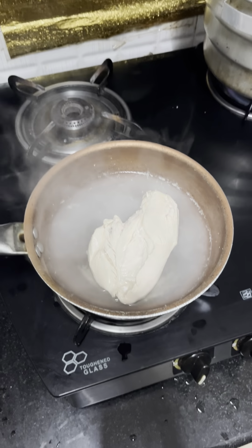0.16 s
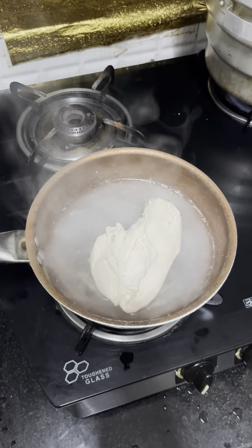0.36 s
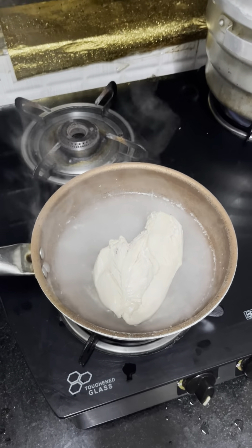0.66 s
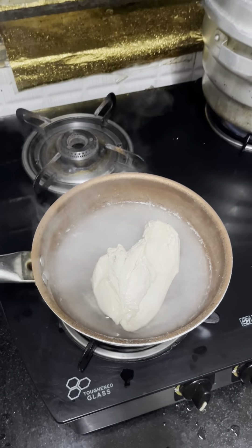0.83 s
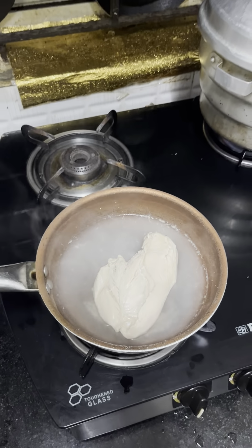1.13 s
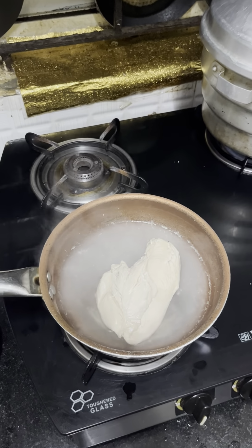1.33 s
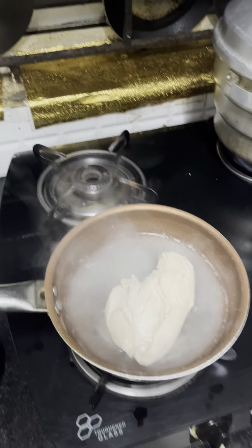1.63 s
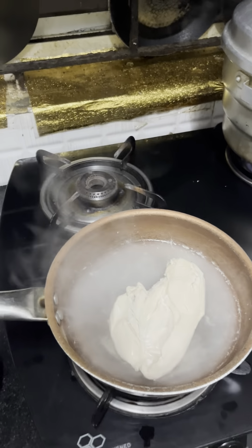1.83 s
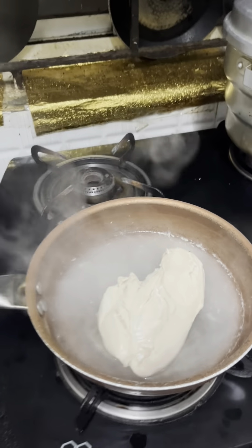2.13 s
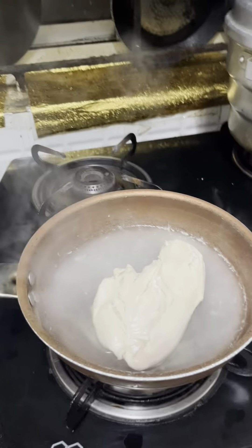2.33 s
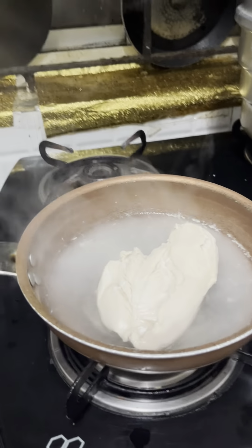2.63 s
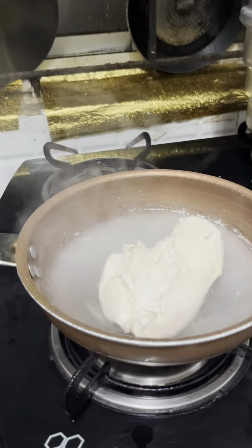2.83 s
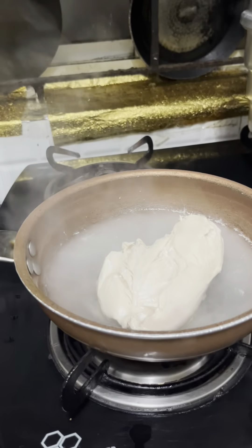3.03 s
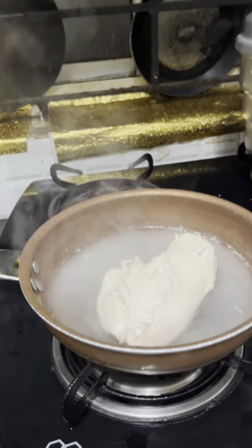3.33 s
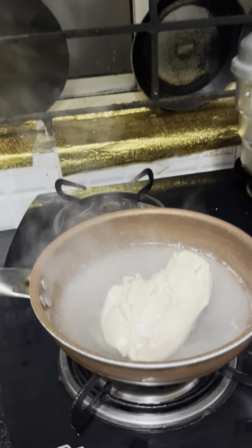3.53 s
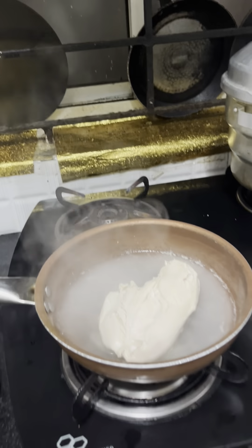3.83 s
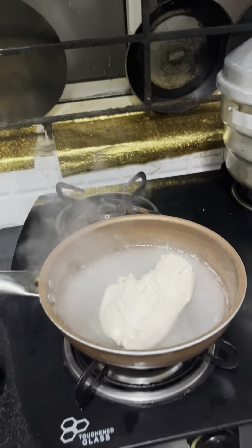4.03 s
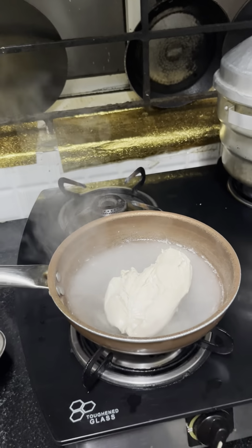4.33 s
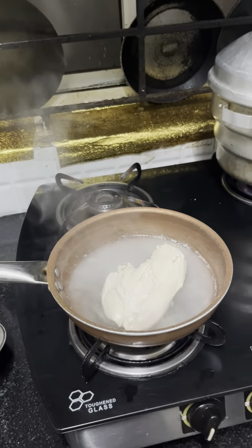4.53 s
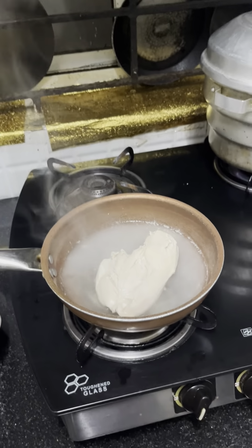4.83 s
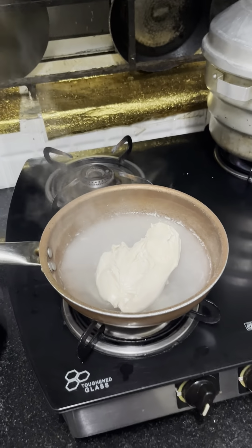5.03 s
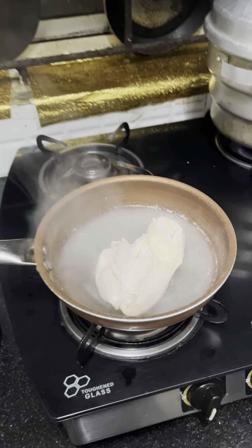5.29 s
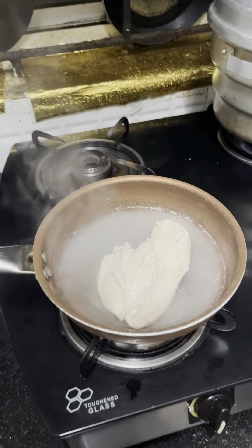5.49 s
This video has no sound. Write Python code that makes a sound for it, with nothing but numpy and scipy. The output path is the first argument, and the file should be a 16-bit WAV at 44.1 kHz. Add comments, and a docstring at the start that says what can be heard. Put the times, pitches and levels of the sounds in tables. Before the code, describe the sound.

Close handheld stereo phone pickup of a pan simmering on a gas stove. It opens with crackling spits over a dense, continuous hiss and the breathy roar of the burner. Low rumble swells in short soft thumps, small bubbles blip and steam pockets gurgle. A fan motor hums below, its deepest tone thinning after the middle. Nearby tiles and metal give short reflections.

```python
"""Shallow water simmers round a piece of chicken in a frying pan on a gas burner, heard from a phone held over it.
From the start the gas rushes and rings the hollows of stove and corner, steam bubbles hiss and a fan motor hums.
Droplets spit on the hot rim, thickest at first; the low rumble swells in short soft booms near 150 Hz and larger
steam pockets gurgle. From 1.7 s the phone leans in, holds and rises; at 3.6 s the fan's blade tone starts to sink
into a node. Round 4.6 s the phone hangs back; echoes off hob, pot and tiles shift with the hand throughout."""
import sys
import numpy as np
from scipy import signal
from scipy.fft import rfft, irfft, next_fast_len
from scipy.io import wavfile

SR = 44100
rng = np.random.default_rng(int(sys.argv[2]) if len(sys.argv) > 2 else 0)


def to_wav(sig):
    """Store sig (one row per channel, or 1-D mono) as 16-bit WAV at the path in sys.argv[1].

    Samples outside -1..1 are clipped; the rate is SR.
    """
    pcm = np.clip(np.atleast_2d(sig), -1, 1) * 32767
    pcm = np.round(pcm).astype(np.int16)
    wavfile.write(sys.argv[1], SR, pcm.T)  # frames by channels


N = 249425
TIME = np.arange(N) / SR
SIZE = next_fast_len(N, True)
FREQ = np.maximum(np.arange(SIZE // 2 + 1) * SR / SIZE, 1)  # bin frequencies in Hz, kept above 0 for logarithms


def amp(db):
    """Level is logarithmic: decibels become an amplitude factor."""
    return 10 ** (np.asarray(db) / 20)


def over_pitch(table):
    """Spectra are drawn on a logarithmic pitch axis: each column is interpolated bin by bin."""
    hz, *columns = np.transpose(table)
    return [np.interp(np.log(FREQ), np.log(hz), column) for column in columns]


def walk(rate_hz):
    """Low-passed noise is a smooth random fluctuation, here of zero mean and unit spread."""
    low_pass = 1 / (1 + (FREQ / rate_hz) ** 4)
    x = irfft(rfft(rng.standard_normal(SIZE)) * low_pass, SIZE)[:N]
    return (x - x.mean()) / x.std()


def ramp(start_s, length_s):
    """Uniform motion: a steady move from 0 to 1."""
    return np.clip((TIME - start_s) / length_s, 0, 1)


def swell(crest_s, width_s):
    """Gaussian envelope: a smooth rise to 1 and back, at 1/e one width from the crest."""
    return np.exp(-((TIME - crest_s) / width_s) ** 2)


def resonance(hz, width_hz):
    """A damped resonator favours its own pitch: gain 1 at the centre, 1/4 one width away."""
    return 1 / (1 + ((FREQ - hz) / width_hz) ** 2) ** 2


def turbulence():
    """Turbulence excites all pitches alike: two unrelated white noises."""
    return rng.standard_normal((2, N))


def bursts(per_s):
    """Shot noise: two trains of clicks at random moments, of random sign and uneven size; unit spread."""
    click = rng.random((2, N)) < per_s / SR
    sign = np.sign(turbulence())
    size = amp(3.5 * turbulence())
    x = click * sign * size
    return x / x.std()


def port_response():
    """Coherence of two receivers: each port's share of a shared and an unrelated sound, as (sound, port, bin)."""
    # Each row: pitch in Hz, likeness of the two microphone ports from 0 to 1, lag of the right port in ms.
    coherence = [(150, .998, 0), (340, .962, -.08), (600, .72, -.06), (1000, .6, .03), (1400, .56, .03),
                 (1750, .85, .02), (2200, .8, .11), (2700, .82, .17), (3700, .33, .22), (4500, .4, .25),
                 (6000, .91, .25), (8000, .89, .25), (10500, .91, .243), (15000, .89, .24)]
    # Each row: pitch in Hz, level of the left port minus the right in dB.
    port_balance = [(60, -1), (150, -0.8), (300, -2.5), (550, -2.7), (900, 0), (1300, 0.7), (2600, 1),
                    (4200, -1.2), (7000, 0), (12000, 0)]
    likeness, lag_ms = over_pitch(coherence)
    likeness = np.clip(likeness, 0, 1)
    sign = np.array([[1], [-1]])  # left, right
    level = amp(sign * over_pitch(port_balance)[0] / 2)
    port = level * np.exp(1j * np.pi * sign * FREQ * lag_ms / 1000)
    shared = np.sqrt((1 + likeness) / 2) * port
    unrelated = np.sqrt((1 - likeness) / 2) * port * sign
    return np.array([shared, unrelated])


def heard(drive, gain, ports):
    """Linear filtering: two white drives of unit spread take on a gain per Hz and reach both ports."""
    at_ports = (rfft(drive, SIZE)[:, None] * ports).sum(axis=0)
    return irfft(at_ports * gain * np.sqrt(SR / 2), SIZE)[:, :N]


def panned(x, pan_db):
    """Level difference places a sound: both ports get it, the left louder by pan_db."""
    return x * amp(np.array([[pan_db], [-pan_db]]) / 2)


def delayed(x, lag_s):
    """Propagation delay: the sound arrives late by a lag that may move, which bends its pitch."""
    return np.interp(TIME - lag_s, TIME, x)


def hollow_note(crest_s, db, hz, length_s, glide=0):
    """Amplitude modulation: a sine swells and dies under a half-sine envelope, gliding by some octaves."""
    progress = np.clip((TIME - crest_s) / length_s + .5, 0, 1)
    turns = np.cumsum(hz * 2 ** (glide * progress)) / SR + rng.random()
    return amp(db) * np.sin(np.pi * progress) * np.sin(2 * np.pi * turns)


def wandering(ring, per_s=1.2, pitch_share=.006, fade_db=1.7):
    """A moving delay shifts pitch: a resonance drifts by a small share, and fades in and out at each port."""
    lag_s = np.cumsum(pitch_share * walk(per_s)) / SR
    fades = [amp(fade_db * walk(per_s)) for _ in ring]
    # dividing by the fade's own strength keeps the mean power
    return np.array([delayed(x, lag_s) * fade / np.sqrt(np.mean(fade ** 2)) for x, fade in zip(ring, fades)])


def flame(lean, back, ports):
    """Turbulent combustion noise rings cavities, whose standing waves shift in strength as the phone moves."""
    # The broad rush of burning gas. Each row: pitch in Hz, level in dB per Hz before gas_db.
    rush = [(22, -102), (35, -87), (44, -71), (53, -72), (64, -59.5), (90, -64.5), (106, -55), (118, -65),
            (240, -67.5), (500, -77.5), (850, -72), (1700, -75), (2800, -75.5), (3800, -84), (8000, -102),
            (13500, -104), (15000, -122)]
    # Hollows of stove, pan and corner. Each row: pitch in Hz, width in Hz, level at the centre in dB per Hz
    # before rumble_db, change when leaning in in dB, change when hanging back in dB.
    hollows = [(138.8, 11.5, -46.5, 0.5, -1.5), (162, 14.3, -47, 1.5, -1), (188.5, 5.6, -53.5, 3, 1),
               (205.3, 8.2, -57.5, 3, 2), (270.4, 25, -59.5, -6, -2), (314.7, 45, -58.5, 2, 1),
               (345, 25, -55.5, -1.5, 0), (396, 32, -65, -11, 3), (423.2, 12.5, -58.5, -2.5, -2),
               (457, 53, -62.5, 4, 2.5), (569.5, 77, -64, -8.5, -1), (664, 78, -67, 4, 2.5),
               (761, 65, -75.5, 7.5, 1), (948, 81, -73, 0.5, -2), (1032, 32, -71.5, -7, -10),
               (1122, 50, -72.5, -2.5, 2), (1452, 34, -70, -6, -0.5), (1595, 82, -73.5, 3, -3),
               (1735, 65, -76, -5.5, 1), (1810, 46, -71, -1.5, -12), (1974, 34, -70, -2.5, -7),
               (2158, 53, -73.5, 4, -2), (2230, 120, -85.5, 7, 3), (2422, 30, -68.5, -4.5, -7.5),
               (2580, 100, -76, -7, -5), (2700, 68, -70.5, -2.5, -3.5), (3035, 87, -77.5, 2.5, 0),
               (3380, 84, -95, 12, -2)]
    gas_db, rumble_db = -1.44, 0.92
    back_gas_db, flutter_db, flutter_hz = -1.5, 0.38, 8.7
    wander_above_hz = 900
    rush_level_db = gas_db + back_gas_db * back + flutter_db * walk(flutter_hz)
    out = heard(turbulence(), amp(over_pitch(rush)[0]), ports) * amp(rush_level_db)
    for hz, width_hz, db, lean_db, back_db in hollows:
        ring = heard(turbulence(), resonance(hz, width_hz), ports)
        if hz > wander_above_hz:
            ring = wandering(ring)
        out = out + ring * amp(rumble_db + db + lean * lean_db + back * back_db)
    return out


def simmer(lean, ports):
    """Dense shot noise: tiny steam bubbles burst so often that they merge into a seething hiss."""
    # Hiss of the bursting bubbles. Each row: pitch in Hz, level in dB per Hz before the boil level.
    fizz = [(500, -100), (1500, -87), (2800, -83.5), (3800, -83.4), (5000, -82.1), (6300, -87.8),
            (7700, -85.9), (9000, -91.4), (10400, -96.5), (11500, -96.6), (13700, -96.6), (14500, -107),
            (15500, -118)]
    # The boil surges and settles. Each row: crest in seconds, half-width in seconds, gain in dB.
    surges = [(.05, 0.16, 2.5), (1.7, 0.3, 1.3)]
    steady_db, lean_db = -1.16, 0.4  # the hiss grows with the phone close over the pan
    boil_db = steady_db + lean_db * lean + sum(db * swell(s, width_s) for s, width_s, db in surges)
    clicks = bursts(per_s=17000) * amp(.4 * walk(20))
    return heard(clicks, amp(over_pitch(fizz)[0]), ports) * amp(boil_db)


def blips(count=700, blip_db=-52, low_hz=1100, high_hz=3400, cycles=11, rise=0.0056):
    """Bubble resonance: small bubbles all over the pan ring and die away, rising in pitch as they surface."""
    age = TIME[:SR // 20]
    out = np.zeros((2, N + len(age)))
    for when, pitch, strength, place in rng.random((count, 4)):
        turns = low_hz * (high_hz / low_hz) ** pitch * age
        envelope = np.exp(-turns / cycles) * (1 - np.exp(-turns))
        ring = envelope * np.exp(2j * np.pi * turns * (1 + rise * turns / cycles))
        start = int(when * N)
        # each bubble reaches the two ports with its own phase
        other_port = ring * np.exp(-1j * np.pi * place * pitch)
        out[:, start:start + len(age)] += strength ** 2 * np.imag([ring, other_port])
    return out[:, :N] / out.std() * amp(blip_db)


def fan(back, waver_hz=0.12, waver_db=0.26, pan_db=1.0):
    """Periodic sources give pure tones: blade tone and mains hum waver, the blade tone fading into a node."""
    blade_hz, mains_hz = 67, 99.9
    node_s, node_entry_s, node_db = 3.6, .65, -20  # the phone drifts into the node and stays there
    blade_db = -41 + node_db * ramp(node_s, node_entry_s)
    mains_db = -34 - 1.8 * back
    out = 0
    for hz, db in ((blade_hz, blade_db), (mains_hz, mains_db)):
        turns = np.cumsum(hz + waver_hz * walk(3.2)) / SR + rng.random()
        level = np.sqrt(2) * amp(db + waver_db * walk(5.1))
        out = out + level * np.sin(2 * np.pi * turns)
    return panned(out, pan_db)


def spits(ports, rise_s=0.0033, top_hz=14500):
    """Flash boiling: a droplet on hot metal gives a quick cloud of bright clicks that dies exponentially."""
    # Each row: start in seconds, level in dB before rise and decay, centre in Hz, width in Hz,
    # decay time in seconds.
    droplets = [(.002, -54, 9500, 6000, .06), (.057, -38.5, 3460, 560, 0.018), (.078, -49, 9500, 6000, .04),
                (.113, -45, 10500, 6500, .028), (.116, -43, 4700, 1600, 0.023),
                (0.133, -33.5, 3260, 480, 0.019), (.158, -47, 8500, 5000, .012),
                (.199, -45, 11500, 3000, 0.012), (1.12, -48, 3800, 1200, .008),
                (1.806, -37, 2800, 400, .014), (2.219, -45, 9300, 5200, 0.026),
                (2.221, -39, 3750, 950, 0.023), (2.685, -46, 7800, 1800, .007),
                (2.975, -45, 8000, 2000, .007), (3.045, -58, 12500, 3000, .04),
                (3.675, -42, 3800, 1200, 0.0064), (4.16, -50.5, 9500, 5000, .022),
                (5.47, -55, 11500, 5000, .07), (5.538, -48, 12500, 3500, .018),
                (5.58, -54, 11700, 5000, 0.1)]
    treble = 1 / (1 + (FREQ / top_hz) ** 30)
    out = 0
    for s, db, hz, width_hz, decay_s in droplets:
        clicks = bursts(per_s=5000)
        cloud = heard(clicks, resonance(hz, width_hz) * treble, ports)
        age = np.maximum(TIME - s, 0)
        envelope = (1 - np.exp(-age / rise_s)) * np.exp(-age / decay_s)
        out = out + cloud / cloud.std() * amp(db) * envelope
    return out


def rumble_swells(length_s=0.075, pan_db=-1.4):
    """Narrowband noise fluctuates by chance: the low rumble near 150 Hz swells briefly, as short soft booms."""
    # Each row: crest in seconds, peak level in dB, pitch in Hz.
    booms = [(.088, -23.5, 141.5), (.325, -22, 153), (.803, -24, 148.4), (.913, -23.5, 146.8),
             (1.287, -23.5, 156), (1.479, -29, 149.8), (1.625, -23.5, 151), (1.695, -25, 151),
             (1.763, -21, 152.5), (1.933, -23.5, 148.6), (2.123, -23, 158.4), (2.384, -24, 161),
             (2.53, -27.5, 158), (2.75, -25.5, 149.1), (3.151, -20.5, 148.5), (3.43, -25.5, 146.7),
             (3.604, -26.5, 154), (3.691, -24.5, 152), (3.788, -28, 157.2), (3.947, -24.5, 147),
             (4.06, -23, 147.6), (4.845, -27, 147.1), (5.386, -26.5, 165.4)]
    return panned(sum(hollow_note(s, db, hz, length_s) for s, db, hz in booms), pan_db)


def gurgles(pan_db=-2):
    """Cavity oscillation: a pocket of steam swells and collapses with a soft, hollow note."""
    # Larger bubbles round the meat. Each row: crest in seconds, peak level in dB, starting pitch in Hz,
    # length in seconds, glide in octaves.
    pockets = [(0.307, -32, 337, 0.077, 0.016), (0.7, -40, 686, 0.087, 0.097),
               (0.786, -29.5, 335, 0.088, 0.0089), (1.106, -29, 340, 0.04, .03),
               (1.375, -30.5, 339.5, 0.052, -0.062), (1.457, -28.5, 356, 0.056, 0.059),
               (1.477, -35, 401, .07, 0.093), (1.575, -28.5, 344.8, 0.092, -0.0065),
               (1.694, -30, 410, 0.047, 0.027), (1.748, -29, 340, 0.13, -0.019),
               (2.7, -31, 322, 0.05, -0.055), (3.27, -29, 344, .08, 0.066), (3.392, -34, 333, .08, -0.014),
               (3.614, -31, 323, .06, 0.0086), (3.757, -35, 330, .06, -.08), (4.133, -31, 335, .05, 0.058),
               (4.697, -36, 436, 0.16, -0.13), (4.787, -33.5, 387.6, 0.15, -0.35),
               (4.937, -25, 325, 0.038, 0.017), (5.045, -29, 328, 0.055, 0.043),
               (5.326, -32, 345, 0.1, -0.17)]
    return panned(sum(hollow_note(*row) for row in pockets), pan_db)


def corner(sound, lean, count=8):
    """Comb filtering: hob, pot and tiles echo the middle range, and moving paths slowly shift the colour."""
    # Colour of the echoes. Each row: pitch in Hz, level in dB before echo_db.
    echo_colour = [(400, -30), (1000, -9), (2200, -6.5), (3500, 0), (5000, 0), (7000, -6), (14000, -9)]
    echo_db, near_m, far_m = -6.3, .5, 4.5  # joint level, shortest and longest detour ahead of any motion
    lean_m, sway_m, sway_hz = 0.078, 0.015, 0.67  # how lean and sway of the hand change a path
    port_gap_m, sound_m_s = .14, 343
    echo = amp(echo_db + over_pitch(echo_colour)[0])
    spectrum = rfft(sound, SIZE) / np.sqrt(1 + echo ** 2)  # leaves room for the power of the echoes
    out = irfft(spectrum, SIZE)[:, :N]
    thrown = irfft(spectrum * echo / np.sqrt(count), SIZE)[:, :N]
    for far, facing, side in rng.random((count, 3)):
        path_m = near_m + (far_m - near_m) * far
        path_m = path_m + lean_m * np.cos(np.pi * facing) * lean + sway_m * walk(sway_hz)
        offset_m = port_gap_m * (side - .5)
        lags_s = [(path_m + port * offset_m) / sound_m_s for port in (1, -1)]
        out = out + np.array([delayed(x, lag_s) for x, lag_s in zip(thrown, lags_s)])
    return out


def scene():
    """Superposition: flame, boil, spits, fan and booms add at the two ports as the phone leans in and draws back."""
    ports = port_response()
    # the phone leans in close and low over the pan, holds, and rises again
    lean_start_s, lean_in_s, lean_hold_s, lean_out_s = 1.69, 1, 0.41, 1.57
    lean = ramp(lean_start_s, lean_in_s) - ramp(lean_start_s + lean_in_s + lean_hold_s, lean_out_s)
    back = swell(crest_s=4.56, width_s=1)  # it hangs back for a while
    water = simmer(lean, ports) + blips() + spits(ports) + gurgles()
    echoed = corner(flame(lean, back, ports) + water, lean)
    return echoed + fan(back) + rumble_swells()


def record(dry, top_hz=15720):
    """Band limiting: the phone cuts the top with a steep elliptic low-pass."""
    low_pass = signal.ellip(14, .1, 80, top_hz, fs=SR, output="sos")
    return signal.sosfilt(low_pass, dry)


dry = scene()
out = record(dry)
to_wav(out)
```